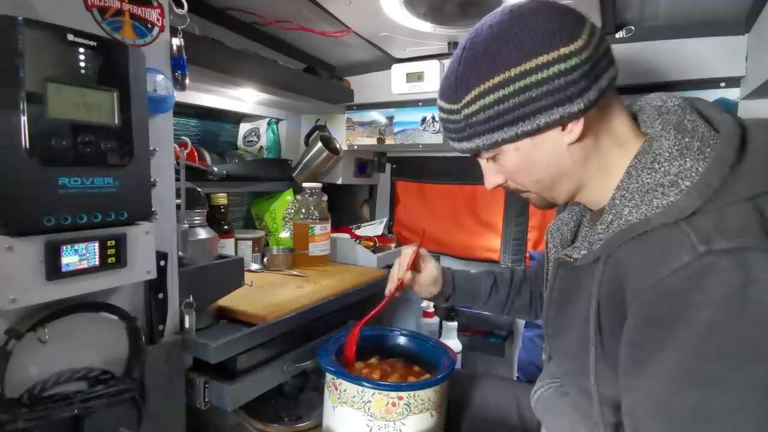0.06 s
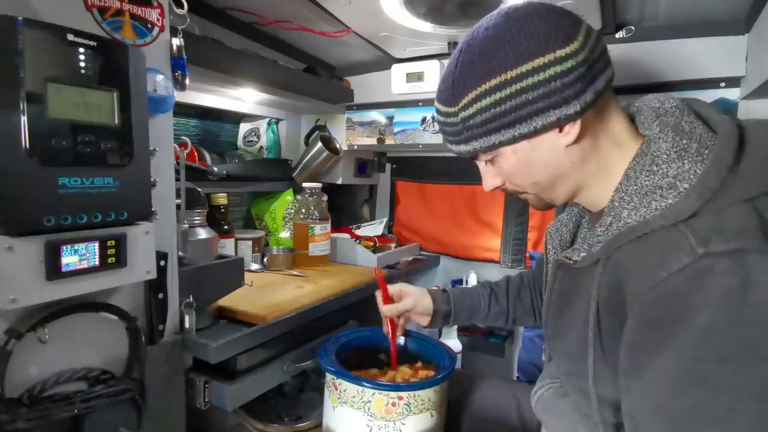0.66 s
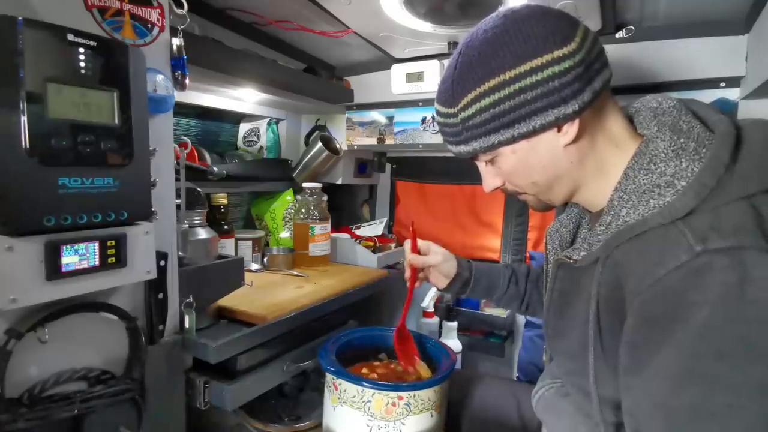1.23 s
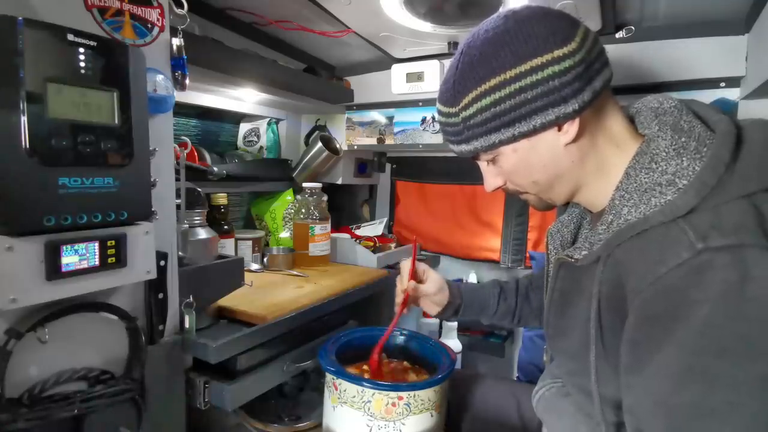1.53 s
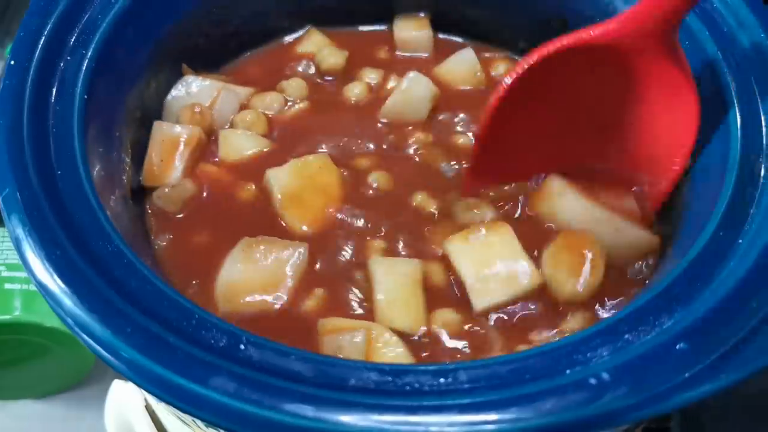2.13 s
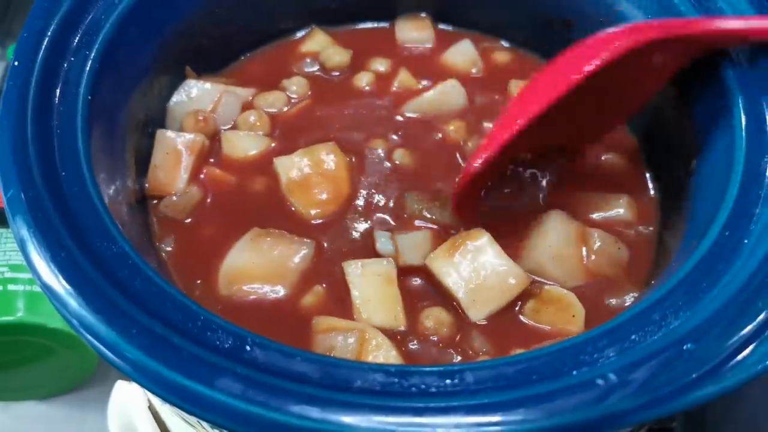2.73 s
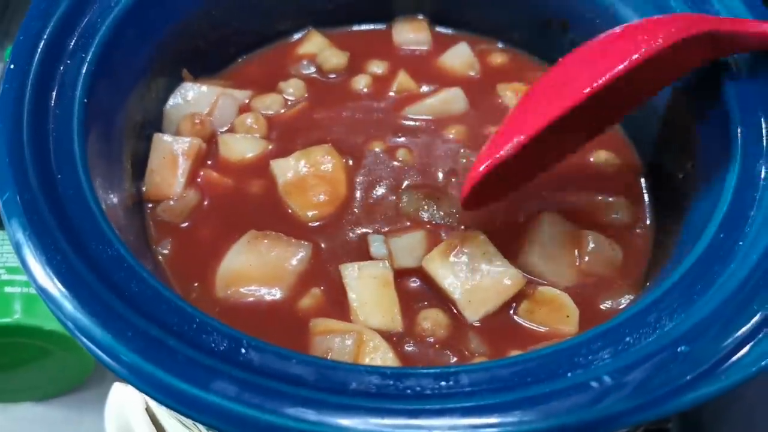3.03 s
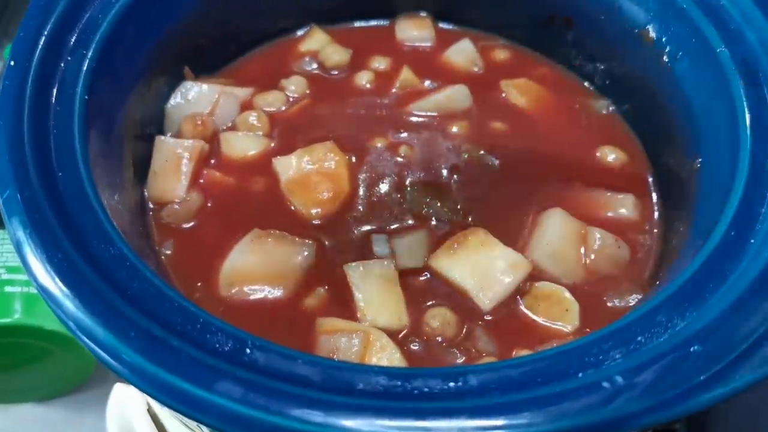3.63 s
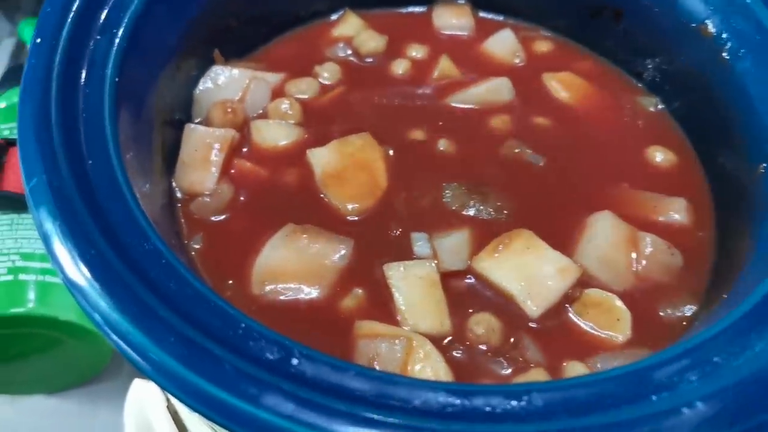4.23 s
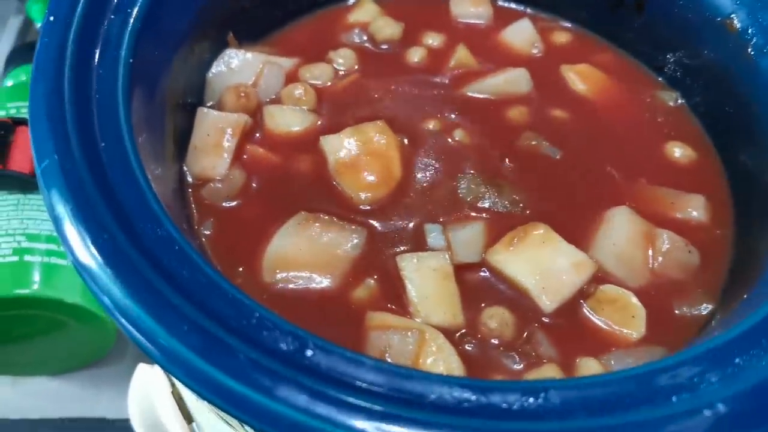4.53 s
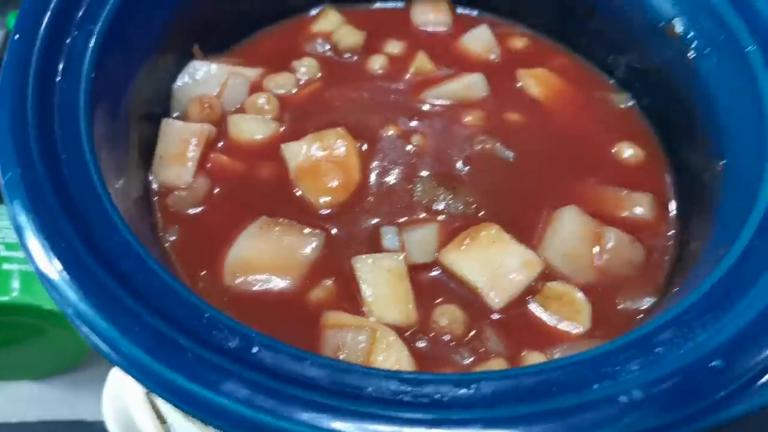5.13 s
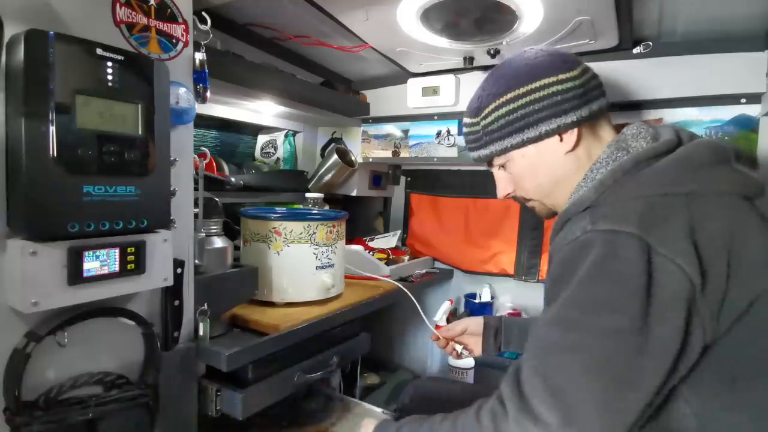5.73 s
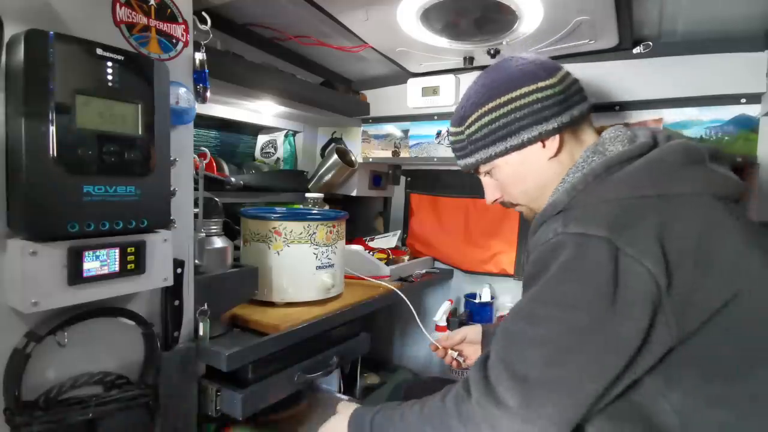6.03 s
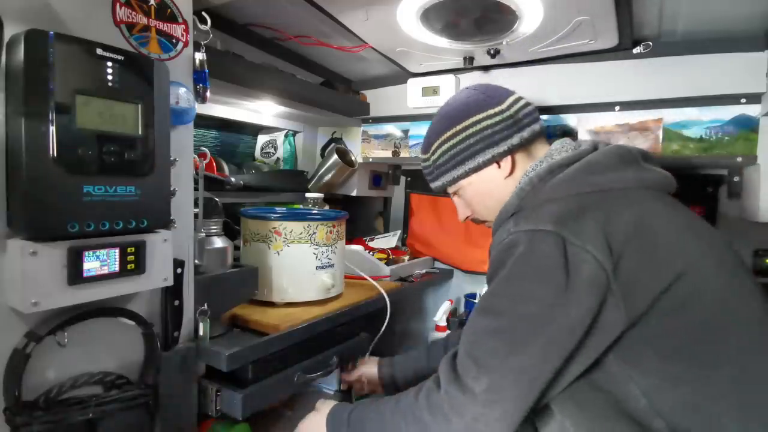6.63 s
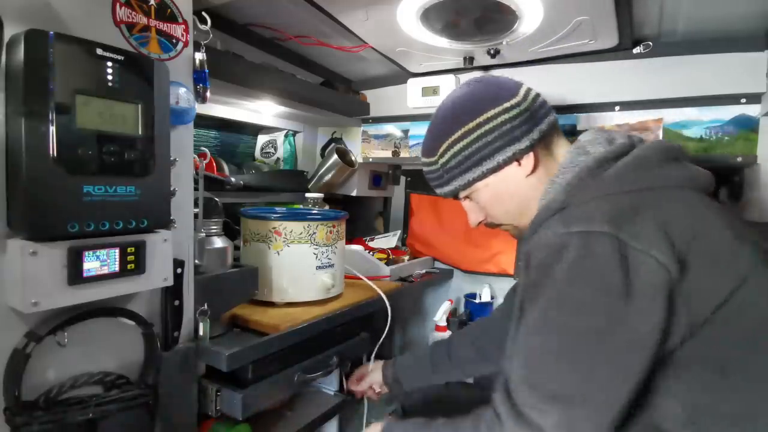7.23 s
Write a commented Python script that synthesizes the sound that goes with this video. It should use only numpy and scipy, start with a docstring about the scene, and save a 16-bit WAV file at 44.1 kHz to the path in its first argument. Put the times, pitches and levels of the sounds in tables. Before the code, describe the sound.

The sounds are close and dry, inside a small camper van, over a faint low rumble, hiss and thin electronic buzz. For the first two seconds a plastic spoon bumps around a stoneware crock, loudest near 0.3 seconds, while the stew softly fizzes, slurps and pops. The spoon slaps the rim at 2.1 and 2.8 seconds, then gives three sharp, bouncing raps between 3.1 and 3.5 seconds, each ringing briefly. A few tiny bubbles follow. At 4.3 seconds a glass lid lands with a muffled knock, scrapes across the rim and drops into its seat at 4.8 with a ringing clink and dull chatter. From 5.3 seconds a drawer rumbles, judders and knocks on its runners, banging shut at about 6.6 seconds. A softer knock and faint rubbing follow until just past 7 seconds. High sounds are louder on the left.

```python
"""Cooking in a small, echo-free camper van, over a low rumble, faint hiss and a thin electronic buzz.
First a plastic spoon bumps round a stoneware crock, while the stew fizzes and pops.
From 2 seconds on, the spoon is knocked clean on the rim, which rings. At 4.3 seconds the lid lands,
scrapes across and drops into its seat. Last, from 5.3 seconds, a drawer rumbles on its runners and
bangs shut. The right side is shaded from the treble, so high sounds are louder on the left."""
import sys
import numpy as np
from scipy import signal
from scipy.fft import rfft, irfft, next_fast_len
from scipy.io import wavfile
from scipy.ndimage import map_coordinates

SR = 44100
rng = np.random.default_rng(int(sys.argv[2]) if len(sys.argv) > 2 else 0)


def transcribe(signal):
    """Save signal, clipped to [-1, 1], as a 16-bit WAV file at the path in sys.argv[1]."""
    frames = np.atleast_2d(signal).T
    limited = np.clip(frames, -1, 1)
    pcm = np.round(limited * 32767).astype(np.int16)
    wavfile.write(sys.argv[1], SR, pcm)


N = 320607


def amp(db):
    """Turn decibels (dB) into a number to multiply a sound by."""
    return 10 ** (np.asarray(db) / 20)


def unit(x):
    """Scale a sound so that its average power is 1."""
    return x / np.sqrt(np.mean(x ** 2) + 1e-20)


def along(points, hz):
    """Read between the rows of a table of frequencies and values."""
    freqs, values = np.transpose(points)
    return np.interp(np.log(hz + 1), np.log(freqs + 1), values)


def colour(points):
    """A tone colour: how strong each frequency is, from rows of Hz and dB."""
    return lambda hz: amp(along(points, hz))


def uneven(depth_db):
    """Random peaks and dips in tone: the many close resonances of a small object."""
    hz = np.linspace(500, 16000, 70)
    return colour(np.column_stack([hz, depth_db * rng.standard_normal(len(hz))]))


def peak(centre_hz, width_hz):
    """The tone colour of one resonance, a pitch at which an object likes to ring."""
    return lambda hz: 1 / (1 + (2 * (hz - centre_hz) / width_hz) ** 2)


def resonances(modes):
    """The tone colour of an object with several resonances."""
    return lambda hz: np.abs(sum(
        (-1) ** k * amp(db) * 1j * hz * width / (centre ** 2 - hz ** 2 + 1j * hz * width)
        for k, (centre, width, db) in enumerate(modes)))


def wobble(rate):
    """A smooth random curve through this many points a second."""
    points = rng.standard_normal(int(N * rate / SR) + 4)
    return map_coordinates(points, [np.arange(N) * rate / SR])


def push(start, length, attack_s, sag, release):
    """The loudness of one swell: it rises, sags, then dies away (both in dB a second)."""
    t = np.maximum(np.arange(N) / SR - start, 0)
    return np.minimum(t / attack_s, 1) * amp(-sag * t - release * np.maximum(t - length, 0))


def add(track, s, sound):
    """Lay a sound into the track, starting at s seconds."""
    part = track[:, max(round(s * SR), 0):][:, :sound.shape[1]]
    part += sound[:, :part.shape[1]]


def filtered(x, gain):
    """Give a sound a tone colour, ringing only after each hit and never before it."""
    size = next_fast_len(x.shape[-1] // 2 + 4096) * 2
    log_gain = np.log(np.maximum(gain(np.fft.rfftfreq(size, 1 / SR)), 1e-6))
    cepstrum = irfft(log_gain, size)
    cepstrum[..., 1:size // 2] *= 2
    cepstrum[..., size // 2 + 1:] = 0
    return irfft(rfft(x, size) * np.exp(rfft(cepstrum)), size)[..., :x.shape[-1]]


# How alike left and right are. Each row: frequency in Hz, likeness from 0 to 1.
LIKENESS = [(200, 0.95), (500, .6), (1200, 0.48), (4000, 0.076)]
# The shading of the right side. Each row: frequency in Hz, left minus right in dB.
SHADE = [(250, -1.5), (550, 9.5), (1000, 5.5), (3000, 8), (7000, 3), (9500, 19.5), (12000, 30.5),
         (15000, 3.5)]

def heard(pair, gain, shade=SHADE):
    """Colour two unrelated sounds as left and right: alike in the bass, leaning left in the treble."""
    size = next_fast_len(pair.shape[-1] + 2048)
    hz = np.fft.rfftfreq(size, 1 / SR)
    turn = np.arccos(np.clip(along(LIKENESS, hz), 0, .999)) / 2
    mid, side = rfft(pair, size) * [np.cos(turn), np.sin(turn)]
    lean = amp(along(shade, hz))
    ears = np.array([lean * (mid + side), mid - side]) / np.sqrt(1 + lean ** 2)
    return filtered(irfft(ears, size)[:, :pair.shape[-1]], gain)


def noise(tone, shade=SHADE):
    """Steady left and right noise with this tone colour."""
    return unit(heard(rng.standard_normal((2, N)), colour(tone), shade))


def grains(rate, spread_db, t60, uneven_db):
    """Tiny random slips, rate a second, each ring an object and fade by 60 dB in t60 seconds."""
    slips = (rng.random(N) < rate / SR) * amp(spread_db * np.clip(rng.standard_normal(N), -2, 2))
    slips *= rng.choice([-1, 1], N)
    out, t = np.zeros((2, N)), np.arange(SR // 12) / SR
    step = round(.08 * SR)  # the contact moves on to a spot that rings differently
    for start in range(0, N, step):
        burst = rng.standard_normal((2, len(t))) * amp(-60 * t / t60)
        body = unit(filtered(burst, uneven(uneven_db)))
        add(out, start / SR, signal.fftconvolve(slips[None, start:start + step], body, axes=1))
    return unit(out)


# How fast the cabin swallows a knock. Each row: frequency in Hz, seconds to fade by 60 dB.
CABIN_FADE = [(60, .4), (150, 0.039), (400, 0.15), (1000, 0.081), (3000, 0.065), (8000, 0.072),
              (15000, 0.037)]

def blows(rows, tone, modes, shade, thud_db, clack_db, tick_db, ring_db, clink_db, ping_db,
          burst_t60, room_db, snap_db, rise_s):
    """Each blow is a snap, a burst from the struck object, the cabin's answer and some ringing notes."""
    out, t = np.zeros((2, N)), np.arange(SR // 2) / SR
    onset = 1 - np.exp(-t / rise_s)
    bands = [signal.butter(4, edge, kind, fs=SR, output="sos")
             for edge, kind in [(500, "low"), ((500, 7000), "band"), (7000, "high")]]
    for s, clack, thud, tick, ping in rows:
        hz, times, spectrum = signal.stft(rng.standard_normal((2, len(t))), SR, nperseg=128)
        room_fade = amp(room_db - 60 * times / along(CABIN_FADE, hz)[:, None])
        room = signal.istft(spectrum * room_fade, SR, nperseg=128)[1][:, :len(t)]
        burst_fade = amp(-60 * t / burst_t60) + amp(snap_db - 60 * t / 0.02)
        burst = rng.standard_normal((2, len(t))) * burst_fade
        # each spot brings out different pitches, above all its "ping"
        others, favoured = uneven(depth_db=3.5), peak(ping, .16 * ping)
        spot_tone = lambda f: colour(tone)(f) * others(f) * amp(ping_db * favoured(f))
        hit = heard((burst + room) * onset, spot_tone, shade)
        # thud is the bass, clack the middle, tick the treble
        for band, level in zip(bands, amp([thud + thud_db, clack + clack_db, tick + tick_db])):
            part = signal.sosfilt(band, hit)
            add(out, s, level * part / np.sqrt(np.mean(part[:, :SR // 50] ** 2)))
        for f, db, t60 in modes:
            # a heavy blow rings the low notes, a hard one the high notes
            drive = thud + ring_db if f < 2550 else clink_db + (clack if f < 7000 else tick)
            fade = amp(drive + db + rng.normal(0, 2.4) - 60 * t / t60)
            lean = amp(along(shade, f))
            pan = np.array([[lean], [1]]) / np.hypot(lean, 1)
            phase = np.arccos(np.clip(along(LIKENESS, f), 0, 1)) * rng.standard_normal((2, 1)) / 2
            pitch = f * (1 + 0.0035 * rng.standard_normal())
            add(out, s, onset * fade * pan * np.sin(2 * np.pi * pitch * t + phase))
    return out


# The tone of the still cabin. Each row: frequency in Hz, relative level in dB.
CABIN_TONE = [(22, -12.5), (45, -12.5), (80, -24.5), (123, -31.5), (198, -36), (527, -47.5), (1330, -51.5),
              (5680, -56.5), (16000, -58.5)]
# The background's balance. Each row: frequency in Hz, left minus right in dB.
BACKGROUND_SHADE = [(60, -5.5), (500, -3), (5000, 0), (15000, 15)]

def cabin():
    """A low, unsteady rumble lies under faint hiss."""
    return amp(-58 + 0.75 * wobble(5.5)) * noise(CABIN_TONE, BACKGROUND_SHADE)


# The tone of the buzz. Each row: frequency in Hz, relative level in dB.
BUZZ_TONE = [(6500, -23), (8000, 1), (10000, 4), (12000, -1.5), (14500, 1)]

def buzz():
    """Electronics leak a faint high buzz that pulses thirty times a second."""
    pulses = np.clip(2 * np.sin(2 * np.pi * 30 * np.arange(N) / SR), 0, 1)
    return amp(-75) * pulses * noise(BUZZ_TONE, BACKGROUND_SHADE)


# Stretches of hiss. Each row: start in seconds, length in seconds, level in dB.
HISS_STRETCHES = [(0, 1.8, -74.5), (5.435, 1.84, -67.5)]
# The tone of the hiss. Each row: frequency in Hz, relative level in dB.
HISS_TONE = [(200, 0.5), (900, -0.5), (2200, -3.5), (6000, -10.5), (11000, -1), (16000, -12.5)]

def wavering_hiss():
    """A faint, wavering hiss is present during the stirring and again at the drawer."""
    level = sum(amp(db) * push(s, length, attack_s=0.012, sag=0, release=102)
                for s, length, db in HISS_STRETCHES)
    return level * amp(1.7 * wobble(13)) * noise(HISS_TONE)


# Bumps on the crock's wall. Each row: start in seconds, strength in dB, hardness in dB, ping in Hz.
BUMPS = [(0.025, -44.5, 11.5, 4450), (0.2581, -17, 3, 2890), (0.439, -24, -15.5, 2090),
         (0.681, -45.5, 1.5, 2530), (0.723, -37.5, 3, 1920), (0.846, -51.5, 0, 1210),
         (0.983, -57.5, -8, 1500), (1.111, -57, -2.5, 2920), (1.256, -50.5, -5.5, 1550),
         (1.279, -49, -4, 2180), (1.508, -49, -5, 1740), (1.531, -42, 10, 9850)]
# The tone of a bump. Each row: frequency in Hz, relative level in dB.
BUMP_TONE = [(82, -39), (140, -7.5), (330, -29), (480, -19), (550, -25.5), (840, -16), (975, -6),
             (1150, -13), (1650, -16), (2030, -10.5), (2380, -13.5), (2880, -7.5), (3600, -14),
             (4970, -20.5), (7600, -17.5), (10100, -8.5), (12400, -7.5), (16000, -22)]
# The wall's ringing notes. Each row: pitch in Hz, relative level in dB, seconds to fade by 60 dB.
WALL_NOTES = [(160, -1, 0.17), (492, -5, 0.15), (936, -4.5, 0.35), (2860, -11.5, 0.03), (7100, -12.5, 0.04),
              (10500, -13, .05)]

def spoon_bumps():
    """The spoon bumps the crock's wall: soft bumps thud more, hard ones tick more."""
    contacts = [(s, db, db - 39.5 - 1.394 * hard, db + hard, ping) for s, db, hard, ping in BUMPS]
    return blows(contacts, BUMP_TONE, WALL_NOTES, SHADE, thud_db=-3, clack_db=-11, tick_db=-8,
                 ring_db=5.5, clink_db=-3.5, ping_db=10.5,
                 burst_t60=0.015, room_db=-1.5, snap_db=0.5, rise_s=0.00041)


# Stirring strokes. Each row: fastest moment in seconds, half width in seconds, fizz in dB, slurp in dB.
STROKES = [(.38, 0.074, -71, -65.5), (0.64, 0.12, -63.5, -68.5), (1.148, 0.26, -73.5, -83.5),
           (1.5, 0.1, -59.5, -74.5)]
# The tone of the fizz. Each row: frequency in Hz, relative level in dB.
FIZZ_TONE = [(3000, -36.5), (5000, -15.5), (8000, -9.5), (11000, -4.5), (16000, -18)]

def stew():
    """The wet stew fizzes and slurps as the spoon sweeps through it."""
    t = np.arange(N) / SR
    fizz, slurp = sum(amp([[fizz_db], [slurp_db]]) * np.exp(-((t - s) / width) ** 2)
                      for s, width, fizz_db, slurp_db in STROKES)
    crackle = grains(rate=180, spread_db=4, t60=.035, uneven_db=4)
    return fizz * unit(heard(crackle, colour(FIZZ_TONE))) + slurp * unit(heard(crackle, peak(2400, 1700)))


# Bubbles in the stew. Each row: start in seconds, relative level in dB, pitch in Hz.
BUBBLES = [(0.53, -51.5, 9530), (0.8135, -46.5, 5060), (1.366, -45, 12700), (1.378, -64.5, 2150),
           (1.411, -72, 2120), (1.461, -60.5, 10000), (1.548, -62, 1440), (1.573, -69.5, 1320),
           (1.61, -44.5, 11600), (1.762, -52, 12500), (1.856, -43, 10870), (3.7586, -59.5, 2295),
           (3.819, -65, 2620), (4.122, -55, 2306)]

def bubbles():
    """Small bubbles burst, each ringing briefly at its own pitch."""
    out, t = np.zeros((2, N)), np.arange(SR // 8) / SR
    for s, db, pitch in BUBBLES:
        burst = rng.standard_normal((2, len(t))) * amp(-60 * t / 0.053)
        pop = heard(burst, peak(pitch, .18 * pitch))
        add(out, s, amp(db + 8.5) * pop / np.abs(pop).max())
    return out


# The rim's ringing notes. Each row: pitch in Hz, relative level in dB, seconds to fade by 60 dB.
RIM_NOTES = [(310, -7, 0.33), (340, -9.5, .2), (476, -13, 0.2), (904, -13, 0.13), (990, -12, 0.25),
             (2360, -24.5, 0.28), (2630, -9.5, 0.051), (3250, -15.5, 0.045), (10800, -9, 0.035)]
# The rim's balance. Each row: frequency in Hz, left minus right in dB.
RIM_SHADE = [(150, -14.5), (550, 7.5), (1000, 1), (3000, 1), (7000, -1), (9500, 17.5), (12000, 22.5),
             (15000, 13)]

def rim(contacts, tone, ping_db):
    """Sharp blows set the stoneware rim ringing."""
    return blows(contacts, tone, RIM_NOTES, RIM_SHADE, thud_db=-4, clack_db=-12.5, tick_db=-10,
                 ring_db=6.5, clink_db=-2.5, ping_db=ping_db,
                 burst_t60=0.019, room_db=-5.5, snap_db=-7, rise_s=0.000061)


# Slaps on the rim. Each row: start in seconds, strength in dB, hardness in dB, ping in Hz.
SLAPS = [(2.099, -23.5, 2, 3750), (2.7805, -17, -1, 985), (2.812, -25.5, -25, 980),
         (2.844, -43.5, -32, 985)]
# The tone of a slap. Each row: frequency in Hz, relative level in dB.
SLAP_TONE = [(100, -21.5), (340, -9.5), (620, -21), (960, -4), (1300, 0), (2450, 2.5), (3100, -6.5),
             (3750, -3.5), (5500, -14), (9500, -18), (10900, -3.5), (16000, -25.5)]

def spoon_slaps():
    """The spoon's hollow bowl slaps the rim."""
    contacts = [(s, db, db - 31, db + hard, ping) for s, db, hard, ping in SLAPS]
    return rim(contacts, SLAP_TONE, ping_db=9)


# Raps on the rim. Each row: start in seconds, strength in dB, hardness in dB, ping in Hz,
# seconds between bounces.
RAPS = [(3.078, -16.5, -4, 2650, 0.014), (3.265, -13, -4.5, 3250, 0.015), (3.428, -13.5, -3.5, 3250, 0.017)]
# The tone of a rap. Each row: frequency in Hz, relative level in dB.
RAP_TONE = [(59, -53), (120, -14), (230, -17), (320, -10.5), (600, -20.5), (920, 0.5), (1200, -10.5),
            (1750, -11), (2150, -2), (2580, 0), (3320, 2), (3900, -5), (5800, -7), (7940, -13.5),
            (10000, -8), (12400, -7.5), (15000, -26)]

def spoon_raps():
    """The spoon's neck raps the rim and bounces twice, weaker and duller each time."""
    loss_db, dull_db, bounce_hz = 10, 6, 2657
    contacts = []
    for s, db, hard, ping, flight in RAPS:
        for k in range(3):
            strength = db - loss_db * k * (k + 1) / 2
            tick = strength + hard - dull_db * k
            contacts.append((s + k * flight, strength, strength - 30.5, tick, bounce_hz if k else ping))
    return rim(contacts, RAP_TONE, ping_db=5)


# The lid lands, catches as it slides, then drops into its seat one side after the other.
# Each row: start in seconds, strength in dB, hardness in dB, ping in Hz.
LANDINGS = [(4.31, -19, -23.5, 1440), (4.376, -32, -17.5, 970), (4.398, -34, -24, 980)]
CATCHES = [(4.627, -35.5, 1, 2520), (4.642, -33.5, -1, 1850), (4.719, -35, -8.5, 1900)]
DROPS = [(4.7755, -20.5, 0.5, 1790), (4.804, -30.5, 0, 2400)]
# The tone of the lid on the rim, and in its seat. Each row: frequency in Hz, relative level in dB.
LANDING_TONE = [(59, -23), (340, 2.5), (433, -7.5), (760, 5), (970, 9), (1130, 2.5), (1800, 10), (2100, -2),
                (2600, -1.5), (3100, -7), (6420, -25.5), (11200, -15.5), (16000, -38.5)]
SEAT_TONE = [(80, 3), (400, -6), (600, 4), (790, 6), (920, -1), (1600, 4.5), (2400, 2.5), (3600, -2.5),
             (6000, -12), (11200, -11), (13000, -12), (15000, -33)]
# The lid's ringing notes. Each row: pitch in Hz, relative level in dB, seconds to fade by 60 dB.
LID_NOTES = [(608, -16, 0.15), (780, -12, 0.091), (1776, -21, 0.37), (1723, -26, 0.4)]

def lid_knocks():
    """The lid knocks on the crock, muffled by the hand at first and ringing freely once let go."""
    held_db, free_db = -5.5, 13.5
    out = np.zeros((2, N))
    for rows, tone, ring_db, t60 in [(LANDINGS, LANDING_TONE, held_db, 0.021),
                                     (CATCHES, SEAT_TONE, held_db, 0.074),
                                     (DROPS, SEAT_TONE, free_db, 0.074)]:
        contacts = [(s, db, db - 9.5, db + hard, ping) for s, db, hard, ping in rows]
        out += blows(contacts, tone, LID_NOTES, SHADE, thud_db=-8, clack_db=-8, tick_db=-1.5,
                     ring_db=ring_db, clink_db=0, ping_db=3.5,
                     burst_t60=t60, room_db=-10.5, snap_db=-12, rise_s=0.0004)
    return out


# The sliding lid's low and high resonances. Each row: pitch in Hz, width in Hz, relative level in dB.
GRIND_PEAKS = [(329, 26, 4.5), (483, 38, 4.5), (590, 46, 9.5), (800, 200, 1), (970, 92, 4), (1136, 150, 1),
               (1410, 140, -1), (1590, 85, -9), (1880, 120, -9), (2100, 250, -6)]
RASP_PEAKS = [(2550, 540, -3), (3400, 860, -7.5), (4800, 500, -7.5), (7030, 300, -3), (8650, 130, -1.5),
              (9600, 170, 0.5), (10800, 620, 4), (13300, 400, 0)]

def lid_scrape():
    """The lid grinds and rasps over the rim, then rocks to rest in its seat with a dull chatter."""
    slips = grains(rate=1200, spread_db=2.5, t60=0.044, uneven_db=1)
    rub = lambda tone: unit(heard(slips, tone))
    # the lid gives off little below 230 Hz
    grind = rub(lambda hz: resonances(GRIND_PEAKS)(hz) * hz ** 4 / (hz ** 4 + 230 ** 4))
    grind *= amp(-40.5) * push(4.376, 0.31, attack_s=0.029, sag=15.5, release=129)
    # the hissy grit needs speed, so it swells later and fades sooner
    rasp = rub(lambda hz: resonances(RASP_PEAKS)(hz) + amp(-24.5))
    rasp *= amp(-39) * push(4.376, 0.31, attack_s=0.072, sag=44, release=129)
    chatter = rub(lambda hz: colour(SEAT_TONE)(hz) / np.hypot(1, hz / 2800))
    chatter *= amp(-34) * push(DROPS[-1][0], 0.085, attack_s=0.012, sag=141.5, release=700)
    return grind + rasp + chatter


# Pushes on the drawer. Each row: start in seconds, length in seconds, runners in dB, rumble in dB.
SLIDES = [(5.278, 0.028, -39, -31.5), (5.504, 0.037, -32.5, -34), (5.572, 0.5, -40, -36.5),
          (5.607, 0.085, -29, -37.5), (5.762, 0.013, -28.5, -31), (6.042, 0.19, -55.5, -44.5),
          (6.626, 0.073, -57, -56), (6.821, 0.032, -43, -39.5), (7.124, 0.049, -56, -45)]
# The tone of the runners. Each row: frequency in Hz, relative level in dB.
RUNNER_TONE = [(180, -15), (398, -14.5), (690, -3.5), (900, -3.5), (1030, -11.5), (1300, -11), (2050, -7.5),
               (2300, -7), (2900, -14), (3250, -16), (4670, -16.5), (7320, -20.5), (10700, -11),
               (16000, -30)]

def drawer_runners():
    """Each push makes the drawer roll and judder on its runners."""
    rubs = [amp(db) * push(s, length, attack_s=0.034, sag=14, release=339) for s, length, db, _ in SLIDES]
    judder = amp(2 * wobble(45))
    slips = grains(rate=700, spread_db=0.5, t60=0.048, uneven_db=1.5)
    return np.linalg.norm(rubs, axis=0) * judder * unit(heard(slips, colour(RUNNER_TONE)))


# The drawer's knocks. Each row: start in seconds, relative clack, thud and tick in dB, ping in Hz.
KNOCKS = [(5.285, -36, -43, -47, 915), (5.319, -44.5, -40.5, -44.5, 2120), (5.498, -45, -52, -38.5, 2400),
          (5.515, -34.5, -36, -38, 1740), (5.624, -29, -37, -32, 1920), (5.652, -43, -33, -26, 656),
          (5.675, -32, -38, -31.5, 670), (5.736, -30.5, -29.5, -35.5, 1880), (5.764, -30.5, -38, -36, 2800),
          (5.788, -38, -42, -31.5, 1940), (6.205, -53.5, -40.5, -52.5, 920), (6.298, -40.5, -41, -44, 920),
          (6.552, -38.5, -48, -32, 1300), (6.579, -25.5, -20, -22.5, 240), (6.853, -39.5, -35, -48.5, 880)]
# The tone of a knock, and of the rumble. Each row: frequency in Hz, relative level in dB.
KNOCK_TONE = [(45, -15.5), (70, -3), (245, 4.5), (320, -2.5), (430, -11.5), (670, -1), (1400, -2.5),
              (2010, 2), (2850, -4), (3400, -7), (7600, -31.5), (10900, -26), (16000, -49)]
RUMBLE_TONE = [(21, -29), (35, 0.5), (70, 1), (107, 2), (208, -8.5), (258, -10.5), (400, -29), (520, -20.5),
               (880, -120)]
# The cabinet's low notes, and the glass lid ringing faintly along at 1790 Hz.
# Each row: pitch in Hz, relative level in dB, seconds to fade by 60 dB.
KNOCK_NOTES = [(64.3, -15, 0.85), (147, -12.5, 0.12), (170, -1, 0.07), (245.3, 1.5, 0.081),
               (648, -22, 0.13), (1790, -28, 0.14)]

def cabinet():
    """The drawer knocks along and hits its stop; every push and thud makes the cabinet rumble."""
    knocks = blows(KNOCKS, KNOCK_TONE, KNOCK_NOTES, SHADE, thud_db=-5.5, clack_db=-2, tick_db=-2.5,
                   ring_db=3, clink_db=0, ping_db=11,
                   burst_t60=0.08, room_db=-7.5, snap_db=-15, rise_s=0.0011)
    shakes = [amp(db) * push(s, length, attack_s=0.034, sag=14, release=154)
              for s, length, _, db in SLIDES]
    booms = [amp(thud - 8) * push(s, 0, attack_s=0.0099, sag=0, release=142)
             for s, _, thud, _, _ in KNOCKS]
    shaking = np.linalg.norm(shakes + booms, axis=0)  # their powers add up
    return knocks + shaking * noise(RUMBLE_TONE)


def scene():
    """Add up everything that sounds in the cabin, left and right."""
    cooking = spoon_bumps() + stew() + spoon_slaps() + spoon_raps() + bubbles()
    lid = lid_knocks() + lid_scrape()
    drawer = cabinet() + drawer_runners()
    return cooking + lid + drawer + wavering_hiss() + cabin() + buzz()


def record(dry):
    """Cut away the very highest treble, above 16000 Hz."""
    size = next_fast_len(N + SR // 2)
    hz = np.fft.rfftfreq(size, 1 / SR)
    return irfft(rfft(dry, size) / (1 + (hz / 16000) ** 120), size)[:, :N]


dry = scene()
out = record(dry)
transcribe(out)
```